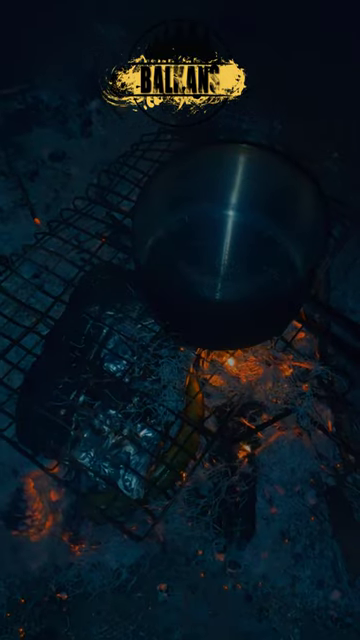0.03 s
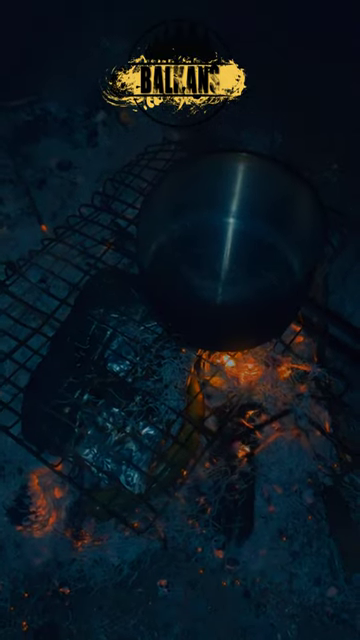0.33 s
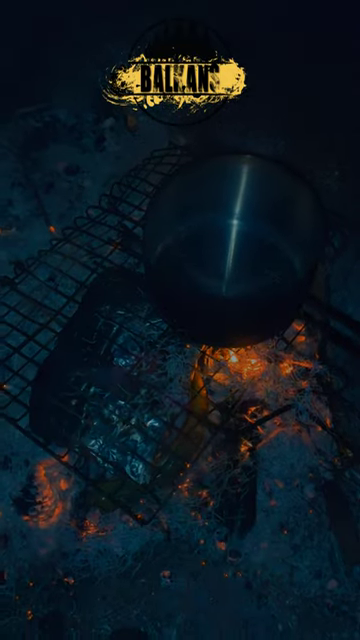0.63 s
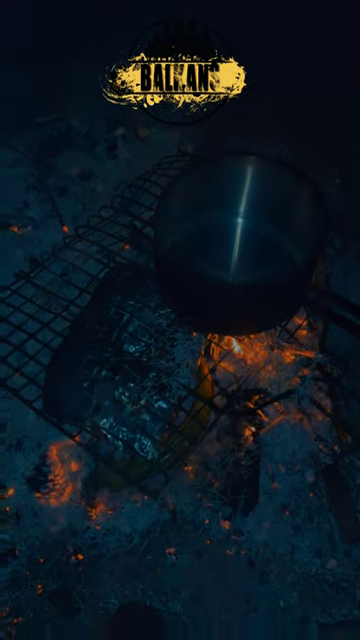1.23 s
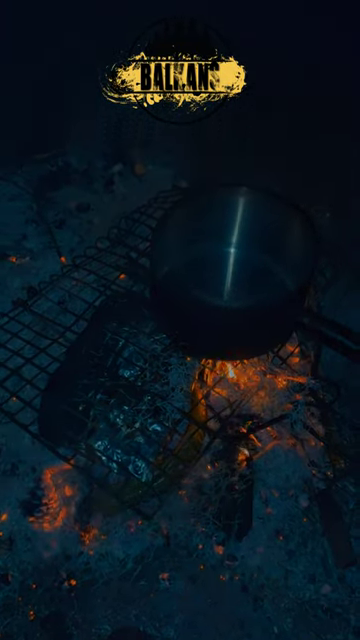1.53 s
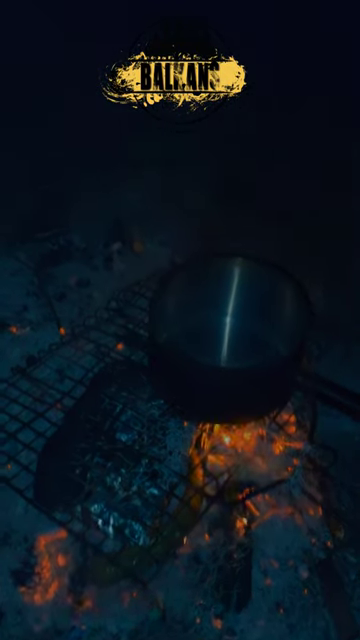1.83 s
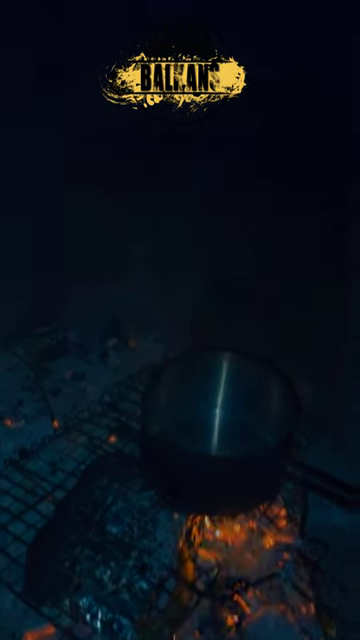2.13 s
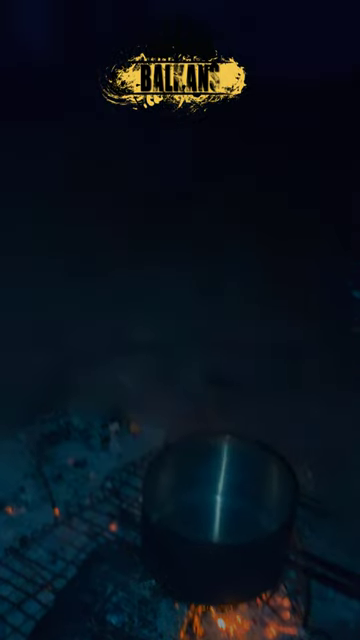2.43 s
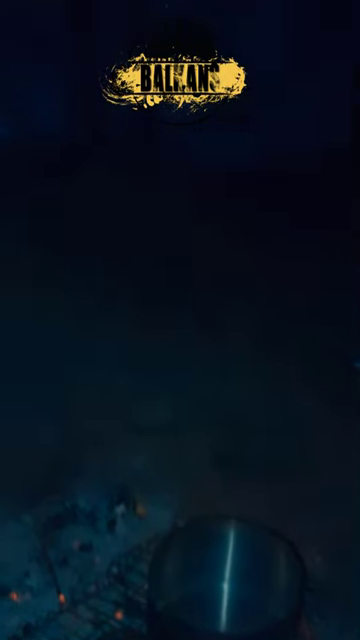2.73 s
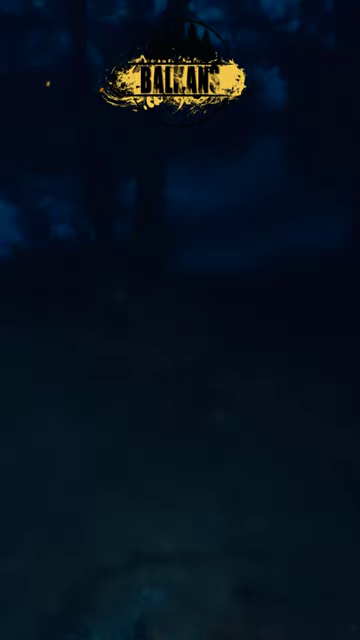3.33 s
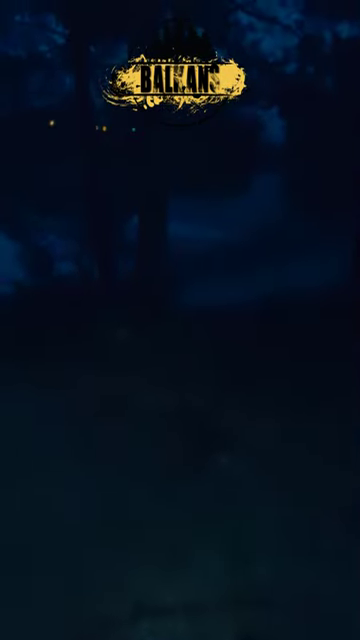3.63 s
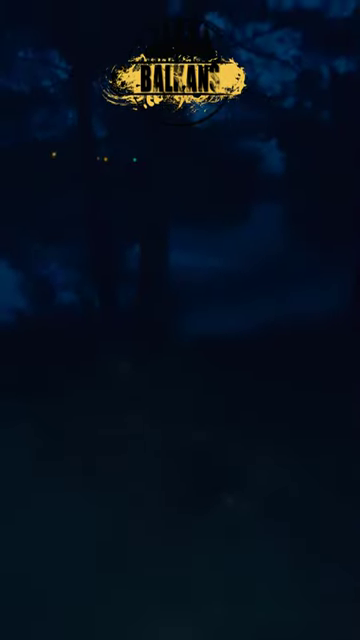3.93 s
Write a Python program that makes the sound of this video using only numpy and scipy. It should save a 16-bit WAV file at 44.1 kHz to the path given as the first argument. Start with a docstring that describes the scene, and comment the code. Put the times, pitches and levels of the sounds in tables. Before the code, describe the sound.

A steady, bright hiss and fine crackle of embers, heard up close in the open air over a barely audible bubbling pot. Charcoal snaps at the start and around the middle, followed by light rustling of clothes beside the microphone.

```python
"""Embers under a simmering pot at night

Outdoors, close to the fire, on a camera's stereo microphone. Embers hiss and crackle, charcoal splits in
sharp snaps, dull ticks come in a short run and bubbles knock in the pot. As the camera tilts up, the hiss
shifts to the right and clothing rustles beside the microphone. Behind it all lie a soft rush, a low
rumble with puffs of air and a faint rising hum. Audio compression warbles faintly on hiss and cloth."""
import sys
import numpy as np
from scipy import signal
from scipy.fft import rfft, irfft, next_fast_len
from scipy.io import wavfile
from scipy.ndimage import uniform_filter1d, map_coordinates

SR = 44100
rng = np.random.default_rng(int(sys.argv[2]) if len(sys.argv) > 2 else 0)


def unload_audio(sound):
    """Save the sound as a 16-bit wav file, at the path given as the first command line argument."""
    columns = np.transpose(np.atleast_2d(sound))
    # keep every value between -1 and 1, then stretch to whole-number steps
    steps = np.round(np.clip(columns, -1, 1) * 32767)
    wavfile.write(sys.argv[1], SR, steps.astype(np.int16))


N = 176400

# Slow swell of the hiss: time_s, gain_db
HISS_SWELL = [(0, 1.5), (.55, 1), (.75, 0.3), (1.15, 1.5), (1.5, 0), (1.78, 2.5), (1.88, -0.5), (2.1, 1.5),
              (2.6, 1.5), (3.3, 1.5), (3.65, 2), (4, -0.5)]

def ember_hiss(level_db=-21):
    """Embers give a steady, fluttering hiss."""
    swell_db, = curves(HISS_SWELL)
    flutter_db = 0.86 * wobble(14) + wobble(70)
    noise = unit(coder_warble(rng.standard_normal((2, N)), depth_db=4.5))
    return low_cut(noise * amp(level_db + swell_db + flutter_db), corner_hz=790)


def ember_crackle(level_db=-20.5):
    """The embers crackle in tiny, bright bursts of noise."""
    envelope = amp(level_db) * bursts(per_s=68, spread_db=2, t60_s=0.012)
    return low_cut(envelope * rng.standard_normal((2, N)), corner_hz=4140)


# Colour of the embers at the microphone, facing the fire and tilted away:
# frequency_hz, facing_left_db, facing_right_db, away_left_db, away_right_db
EMBER_COLOUR = [(1330, -13.5, -13.5, -17.5, -16.5), (2730, -15, -14, -19, -15),
                (3840, -14, -13, -14.5, -13.5), (3920, -11, -12, -13.5, -6.5),
                (4850, -19, -10.5, -21.5, -16.5), (4850, -9.5, -13.5, -10, -6), (5860, -19, -6, -23, -6.5),
                (6620, -10.5, -2.5, -13, -5), (7300, -7.5, -11, -20, -5), (7970, -17, -6.5, -39, -15.5),
                (8100, -11, -14, -10, -12), (9620, -11.5, -16, -19, -14),
                (11400, -21.5, -17.5, -21.5, -14.5), (13200, -14.5, -14, -24, -10.5),
                (15300, -20, -13.5, -26, -13)]

def embers():
    """Hiss and crackle change colour and shift right as the microphone turns from the fire."""
    source = ember_hiss() + ember_crackle()
    hz, left, right, left_away, right_away = np.transpose(EMBER_COLOUR)
    facing = coloured(source, np.c_[hz, left, right])
    away = coloured(source, np.c_[hz, left_away, right_away])
    return (1 - tilt()) * facing + tilt() * away


# Splits in the charcoal: start_s, level_db, right_over_left_db, t60_s, ring_hz, treble_edge_hz
CHARCOAL_SPLITS = [(.1162, -3.8, 5, .008, 6500, 17000), (1.7331, -13, 6, .009, 15000, 17000),
                   (1.7421, -22.5, 6, .010, 12500, 15000), (2.0545, -19, 3, .014, 10500, 13000),
                   (2.0573, -13.8, 3, .019, 7100, 12800), (2.2181, -4.4, 9, .007, 5300, 18000)]
# Spectrum of a split: frequency_hz, gain_db
SPLIT_COLOUR = [(300, -8), (4200, -14), (6600, -3), (8500, 6), (10300, -1), (11800, 5), (15200, 10),
                (17000, -8)]

def snaps(left_lag_s=.0003, attack_s=.00015, ring_db=-5, ring_t60_s=.013):
    """Charcoal splits with a bright burst and a brief ring, reaching the microphone's right side first."""
    out, t = np.zeros((2, N)), np.arange(SR // 20) / SR
    age = np.maximum(t - np.array([[left_lag_s], [0]]), 0)
    rise = 1 - np.exp(-age / attack_s)
    for start_s, level_db, right_db, t60_s, ring_hz, edge_hz in CHARCOAL_SPLITS:
        burst = unit(coloured(rng.standard_normal((2, len(t))), SPLIT_COLOUR))
        burst = filtered(burst, lambda hz: 1 / np.sqrt(1 + (hz / edge_hz) ** 20))
        ring = np.sin(2 * np.pi * (ring_hz * t + rng.random((2, 1))))
        ring *= amp(ring_db - 60 * age / ring_t60_s)
        envelope = amp(-60 * age / t60_s) * rise
        snap = np.array([unit(side) for side in burst * envelope + ring * rise])
        snap *= np.sqrt(np.mean(envelope ** 2))
        add(out, start_s, amp(level_db) * placed(right_db) * snap)
    return out


# Dull ticks near the microphone: start_s, level_db, right_over_left_db
DULL_TICKS = [(1.0595, -24, 8), (1.807, -28, 1), (2.1158, -23, 20), (2.1387, -21.5, 22), (2.1711, -18, 26),
              (2.194, -17, 26), (2.2121, -18, 26), (2.2308, -15, 23), (2.2522, -20, 26), (2.3268, -22, 22),
              (2.3503, -17, 15.5)]
# Spectrum of their crunchy tail: frequency_hz, gain_db
CRUNCH_COLOUR = [(100, -23), (800, -33), (1800, 2.5), (3200, 1), (6000, -11), (15000, -5.5)]

def ticks(click_hz=1650, click_t60_s=.002, knock_hz=240, knock_t60_s=.05, tail_t60_s=.11):
    """Single-cycle clicks close on the right, each with a woody knock and a short crunchy tail."""
    out, t = np.zeros((2, N)), np.arange(SR // 10) / SR
    crumbs_per_s = 2500
    for start_s, level_db, right_db in DULL_TICKS:
        detune = amp(rng.normal(0, 1))
        click = np.sin(2 * np.pi * click_hz * detune * t) * amp(-60 * t / click_t60_s)
        knock = np.sin(2 * np.pi * knock_hz * detune * t) * amp(-17 - 60 * t / knock_t60_s)
        crumbs = rng.standard_normal((2, len(t))) * (rng.random(len(t)) < crumbs_per_s / SR)
        tail = unit(coloured(crumbs, CRUNCH_COLOUR)) * amp(-11.5 - 60 * t / tail_t60_s)
        add(out, start_s, amp([[level_db - right_db], [level_db]]) * (2 * click + knock + tail))
    return out


# Strokes of clothing: centre_s, half_width_s, level_db, extra_treble_db
CLOTH_STROKES = [(1.18, 0.0043, -25, -3), (1.807, 0.0074, -35, -2), (2.125, 0.024, -41, 14),
                 (2.355, 0.0095, -41, 9), (2.46, 0.0055, -36, 11.5), (2.634, .013, -30.5, 1),
                 (2.755, 0.012, -28, -5), (2.823, 0.0071, -28, -11), (2.88, 0.016, -28, -1),
                 (2.914, 0.014, -28, 2), (3.04, 0.022, -30.5, 0), (3.09, 0.022, -29.5, 1),
                 (3.471, .012, -26, 1), (3.524, 0.019, -28.5, 1), (3.595, 0.026, -31.5, 0),
                 (3.646, .036, -27.5, -3)]
# Spectrum of the sliding fibres: frequency_hz, left_db, right_db
FIBRE_COLOUR = [(1500, -22, -19), (3000, -19, -15), (4500, -17, -14), (5200, -14, -4), (7000, -12, 2),
                (7700, -11, -8), (10500, -17, -7), (12000, -20, -8), (13000, -21, -4), (15300, -21, -4.5)]
# Spectrum of the duller rub: frequency_hz, gain_db
RUB_COLOUR = [(800, -5), (1800, -19), (2700, -3), (5000, -13), (9000, -12), (16000, -17)]

def rustle(treble_hz=8500, slow_stroke_s=0.044, rub_db=-7.5):
    """Cloth slides beside the microphone in gritty swells; slower strokes carry more dull rub."""
    t = np.arange(N) / SR
    powers = np.array([amp(db) ** 2 * np.exp(-((t - s) / width) ** 2)
                       for s, width, db, _ in CLOTH_STROKES])
    _, widths, _, treble_db = np.transpose(CLOTH_STROKES)
    grains = unit(rng.standard_normal((2, N)) * amp(3 * wobble(600)))
    fibres = coloured(coder_warble(grains, depth_db=4), FIBRE_COLOUR)
    fibres = unit(low_cut(fibres, corner_hz=1200))
    treble = filtered(fibres, lambda hz: hz > treble_hz)
    slide = np.sqrt(powers.sum(axis=0)) * (fibres - treble)
    slide += np.sqrt(amp(treble_db) ** 2 @ powers) * treble
    rub = unit(coloured(rng.standard_normal((2, N)), RUB_COLOUR))
    rub *= np.sqrt((widths / slow_stroke_s) ** 2 @ powers)
    return slide + amp(rub_db) * rub * placed(right_db=3.5)


# Hollow resonance of the pot: frequency_hz, gain_db
POT_RESONANCE = [(300, -35), (540, -9), (620, 0), (700, 1), (800, -5), (1050, -16), (2500, -40)]

def pot(facing_db=-46, tilt_loss_db=3):
    """Small bubbles knock in the pot over the fire, fainter once the microphone tilts away."""
    bubbles = bursts(per_s=240, spread_db=2, t60_s=.03) * pair(alike=.75)
    return amp(facing_db - tilt_loss_db * tilt()) * unit(coloured(bubbles, POT_RESONANCE))


# Puffs of air by the fire: centre_s, peak_db
AIR_PUFFS = [(.09, -36), (.78, -32), (.89, -37), (1.53, -35), (3.53, -37), (3.98, -36)]

def puffs(pitch_hz=54, half_width_s=.025):
    """The air by the fire gives separate soft pushes of a few low cycles."""
    t = np.arange(N) / SR
    swing = np.sin(2 * np.pi * np.cumsum(pitch_hz * amp(3.3 * wobble(20))) / SR)
    return swing * sum(amp(db) * np.exp(-((t - s) / half_width_s) ** 2) for s, db in AIR_PUFFS)


# Spectrum of the open air: frequency_hz, gain_db
RUSH_COLOUR = [(30, 5.5), (120, 3), (175, 1), (280, -2), (360, -5.5), (440, -2.5), (560, -8.5), (900, -9.5),
               (1300, -15), (2000, -23), (5000, -89)]

def outdoor_rush(rise_db_per_s=0.06):
    """A soft, wide rush wavers behind the fire."""
    level_db = -44 + rise_db_per_s * np.arange(N) / SR + 2.02 * wobble(20)
    return amp(level_db) * unit(coloured(pair(alike=.56), RUSH_COLOUR))


# Spectrum of the rumble: frequency_hz, gain_db
RUMBLE_COLOUR = [(8, -43), (22, -18), (38, -1.5), (65, 1.5), (95, -9), (130, -21.5), (300, -25),
                 (1000, -90)]
# Its ebb and swell: time_s, level_db
RUMBLE_SWELL = [(0, -45), (.7, -44.5), (1.0, -52.5), (2.3, -59), (3.3, -48), (3.55, -38), (3.85, -41.5)]

def rumble():
    """Deep background noise sinks away, then swells near the end."""
    level_db, = curves(RUMBLE_SWELL)
    return amp(level_db) * unit(coloured(pair(alike=.6), RUMBLE_COLOUR))


# Course of the low hum: time_s, pitch_hz, level_db
HUM_GLIDE = [(1.78, 72, -65), (1.86, 73, -43.5), (2.2, 76, -46.5), (2.65, 86, -46), (2.9, 92, -68)]

def hum():
    """A faint, wavering tone climbs in the background."""
    pitch_hz, level_db = curves(HUM_GLIDE)
    envelope = np.sqrt(2) * amp(level_db + 2.5 * wobble(20))
    return envelope * np.sin(2 * np.pi * np.cumsum(pitch_hz + 4 * wobble(30)) / SR)


def tilt(start_s=1.44, end_s=2.74):
    """0 while the microphone faces the fire, 1 once it has tilted away."""
    return curves([(start_s, 0), (end_s, 1)])[0]


def bursts(per_s, spread_db, t60_s):
    """Envelope of randomly timed, quickly dying bursts of uneven size."""
    hits = (rng.random(N) < per_s / SR) * amp(spread_db * np.minimum(rng.exponential(size=N), 3))
    decay = amp(-60 * np.arange(SR // 20) / SR / t60_s)
    return np.sqrt(np.abs(signal.fftconvolve(hits ** 2, decay ** 2)[:N]))


def coder_warble(x, depth_db):
    """The faint whistly warble of audio compression: brief, narrow patches of random gain."""
    spectra = signal.stft(x, nperseg=1024)[2]
    patches = uniform_filter1d(rng.standard_normal(spectra.shape), size=3, axis=1)  # across frequency
    patches = uniform_filter1d(patches, size=4, axis=2)  # across time
    return signal.istft(spectra * amp(depth_db * unit(patches)), nperseg=1024)[1][:, :N]


def amp(db):
    """Decibels to gain."""
    return 10 ** (np.asarray(db) / 20)


def unit(x):
    """Scale to rms 1."""
    return x / np.sqrt(np.mean(x ** 2) + 1e-20)


def curves(rows):
    """One value per sample for each column after the time."""
    times, *columns = np.transpose(rows)
    return [np.interp(np.arange(N) / SR, times, column) for column in columns]


def wobble(per_s):
    """A smooth random curve with per_s knots a second."""
    return map_coordinates(rng.standard_normal(int(N * per_s / SR) + 4), [np.arange(N) * per_s / SR])


def filtered(x, response):
    """Apply a gain given as a function of frequency."""
    size = next_fast_len(x.shape[-1] + 8192)
    return irfft(rfft(x, size) * response(np.fft.rfftfreq(size, 1 / SR)), size)[..., :x.shape[-1]]


def coloured(x, table):
    """Filter by rows of frequency_hz, gain_db, with one gain column per channel or one for all."""
    knots_hz, *gains = np.transpose(table)
    return filtered(x, lambda hz: amp([np.interp(np.log(hz + 1), np.log(knots_hz), db) for db in gains]))


def low_cut(x, corner_hz):
    """Remove the bass."""
    return filtered(x, lambda hz: hz ** 2 / np.sqrt(hz ** 4 + corner_hz ** 4))


def pair(alike):
    """Left and right noise with correlation alike."""
    return np.sqrt(alike) * rng.standard_normal(N) + np.sqrt(1 - alike) * rng.standard_normal((2, N))


def add(out, start_s, sound):
    """Mix a sound in at start_s."""
    part = out[:, round(start_s * SR):][:, :sound.shape[-1]]
    part += sound[..., :part.shape[-1]]


def placed(right_db):
    """Left and right gains, the right louder by right_db."""
    return amp([[-right_db / 2], [right_db / 2]])


def scene():
    """Fire, clothing and pot near the microphone, the outdoors behind them."""
    near = embers() + snaps() + ticks() + rustle() + pot()
    background = (outdoor_rush() + rumble() + hum()) * placed(right_db=0.3)
    return near + background + puffs()


def record(dry):
    """The camera rounds off the tallest peaks, cuts the top treble and adds a small constant offset."""
    ceiling, top_hz, offset = .9, 15950, .0537
    rounded = dry / (1 + np.abs(dry / ceiling) ** 6) ** (1 / 6)
    return filtered(rounded, lambda hz: hz < top_hz) + offset


dry = scene()
out = record(dry)
unload_audio(out)
```